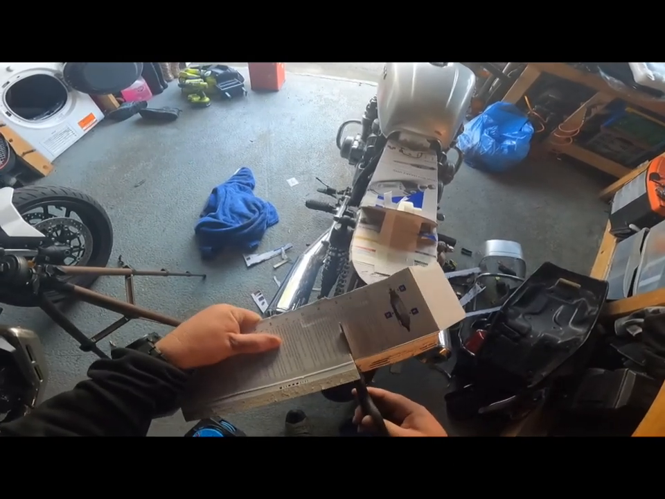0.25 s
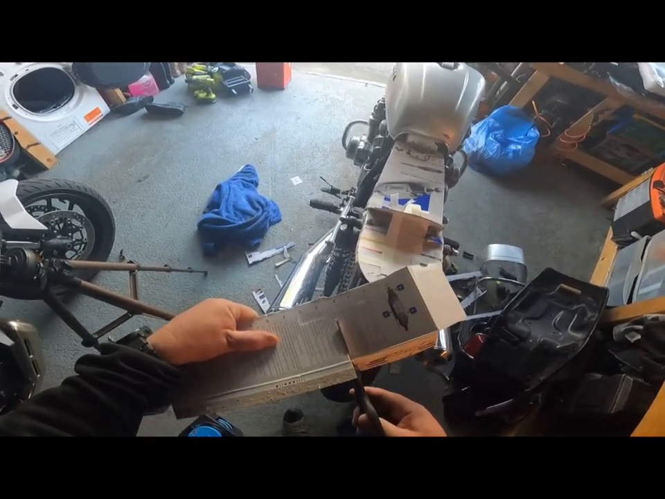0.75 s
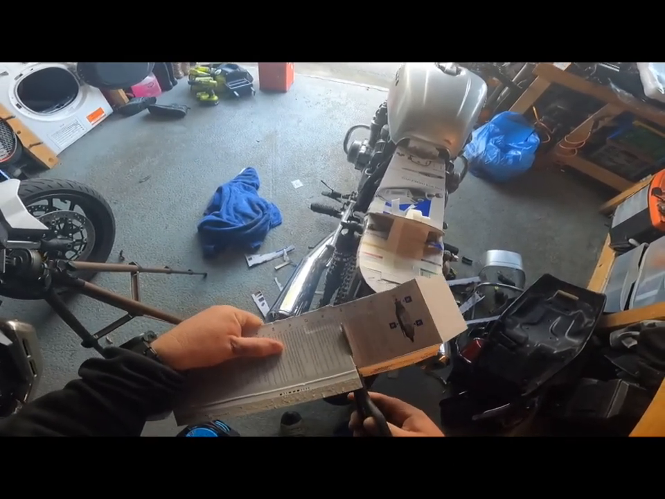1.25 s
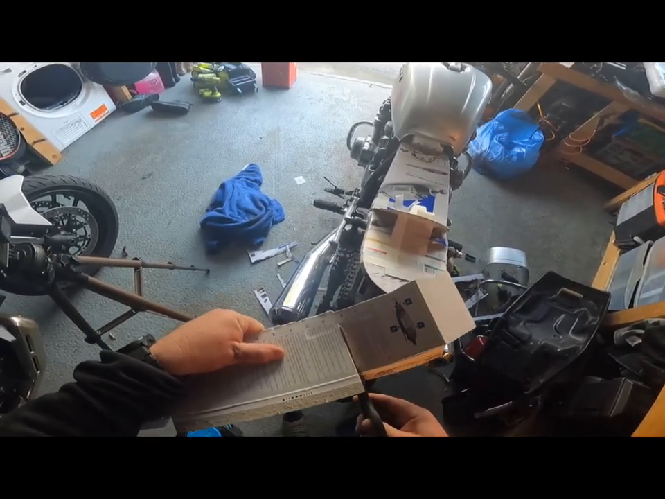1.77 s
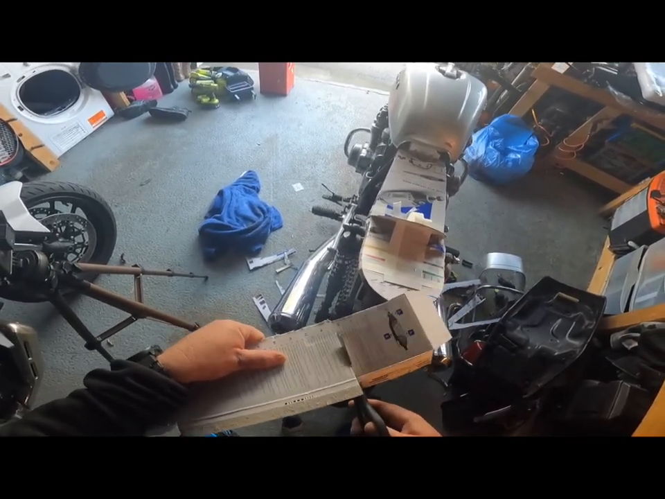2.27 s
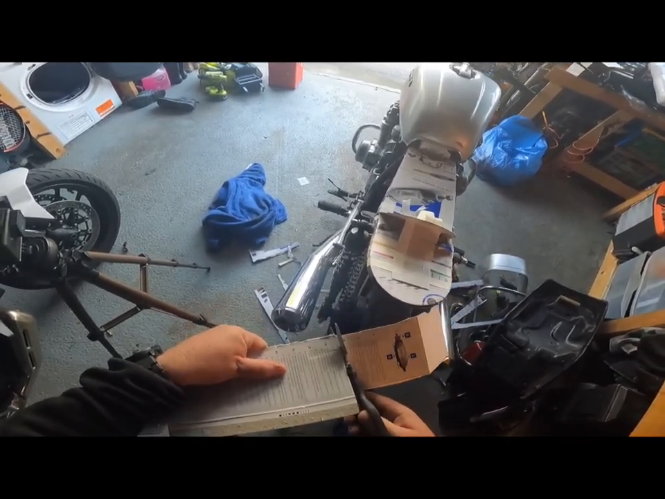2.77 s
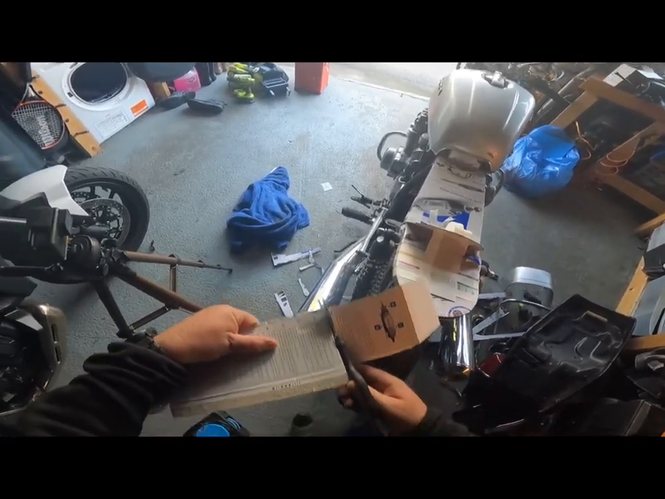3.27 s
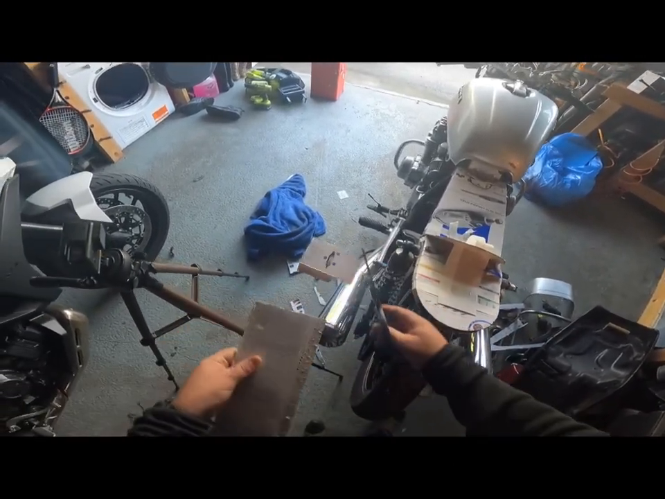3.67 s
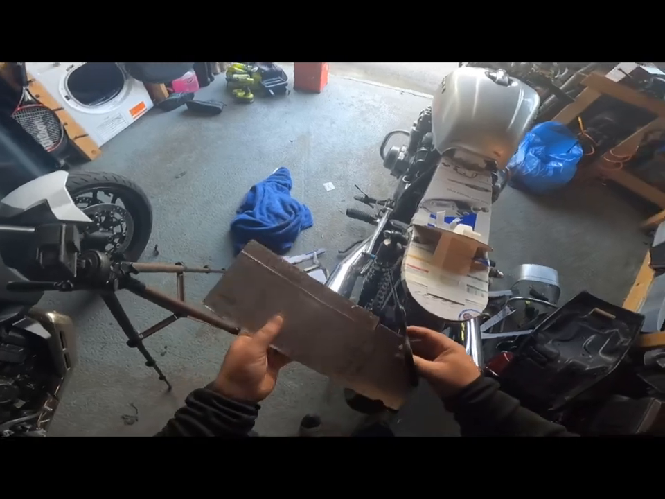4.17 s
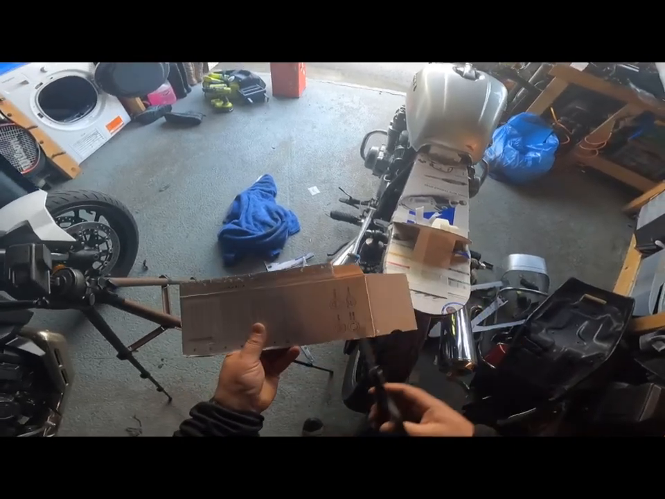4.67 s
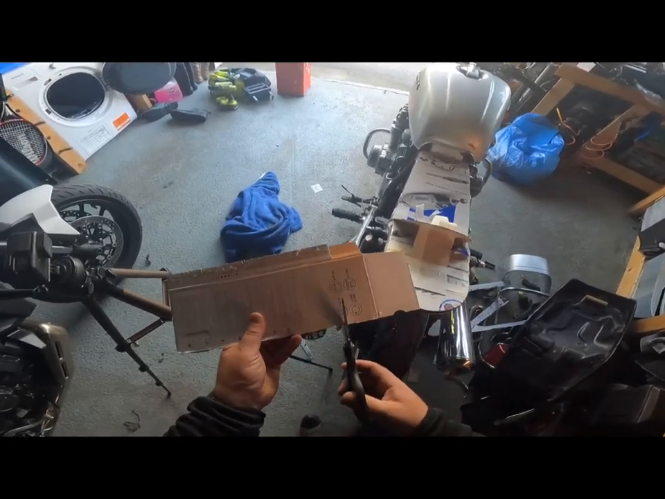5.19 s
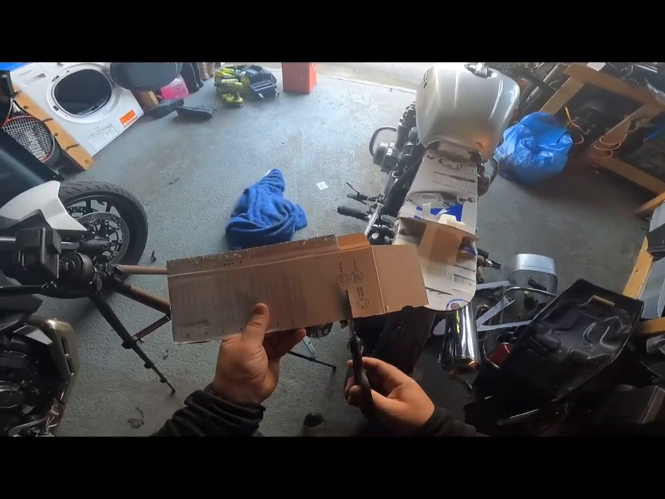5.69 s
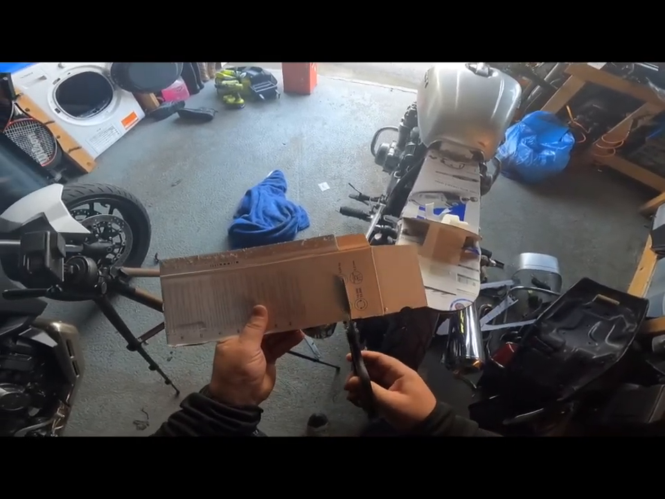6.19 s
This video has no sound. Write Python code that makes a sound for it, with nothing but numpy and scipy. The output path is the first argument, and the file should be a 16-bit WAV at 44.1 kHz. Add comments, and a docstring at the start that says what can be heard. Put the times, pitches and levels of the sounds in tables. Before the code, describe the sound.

Corrugated cardboard crunches and snaps between scissor blades, in about six irregular bursts separated by light rustling and rubbing. The cutting then turns quieter, ending in dry scrapes, small ticks and thin, faint squeaks of steel on board. The microphone is very close, in a garage with a short echo, a soft hiss and a slight low rumble.

```python
"""Scissors cutting corrugated cardboard

A strip is cut close to a body-worn camera in a garage. The board cracks and knocks as its flutes
give way; the blades scrape along the cut, tick, clack and faintly sing. The concrete room answers
briefly, and a low rumble wavers over a quiet hiss."""
import sys
import numpy as np
from scipy import signal
from scipy.fft import rfft, irfft, next_fast_len
from scipy.io import wavfile
from scipy.ndimage import uniform_filter1d, map_coordinates

SR = 44100
rng = np.random.default_rng(int(sys.argv[2]) if len(sys.argv) > 2 else 0)


def to_wav(s):
    """Save 16-bit WAV."""
    ch = np.atleast_2d(s).T  # columns
    pcm = np.round(np.clip(ch, -1, 1) * 32767)  # PCM
    wavfile.write(sys.argv[1], SR, pcm.astype(np.int16))


N = 283991
EVENT_T = np.arange(SR // 4) / SR  # time axis of one hit [s]
HOLD_POWER = 1.24  # a ring holds while the board is pushed, then stops quickly


def amp(db):
    """Gain of a level in dB."""
    return 10 ** (np.asarray(db) / 20)


def unit(x):
    """x at rms 1."""
    return x / np.sqrt(np.mean(x ** 2) + 1e-20)


def span(start_s, samples=len(EVENT_T)):
    """Sample slice of one event."""
    return slice(round(start_s * SR), round(start_s * SR) + samples)


def along(points, hz):
    """Interpolate (Hz, value) points on a log frequency axis."""
    f, values = np.transpose(points)
    return np.interp(np.log(hz + 1), np.log(f + 1), values)


def wobble(rate_hz):
    """Smooth random curve, rate_hz knots a second."""
    knots = rng.standard_normal(int(N * rate_hz / SR) + 4)
    return map_coordinates(knots, [np.arange(N) * rate_hz / SR])


def filtered(x, response):
    """Apply a complex frequency response."""
    size = next_fast_len(N + SR // 2)
    return irfft(rfft(x, size) * response(np.fft.rfftfreq(size, 1 / SR)), size)[..., :N]


def noise(spectrum):
    """Coloured noise at rms 1."""
    return unit(filtered(rng.standard_normal(N), lambda hz: amp(along(spectrum, hz))))


def resonate(x, modes, top_hz):
    """Drive broad, well damped modes; dull above top_hz."""
    def response(f):
        peaks = sum((-1) ** k * amp(db) * 1j * f * width / (hz * hz - f * f + 1j * f * width)
                    for k, (hz, width, db) in enumerate(modes))
        return peaks / (1 + 1j * f / top_hz) ** 2
    return filtered(x, response)


def ringing(db, hz, t60_s, hold=HOLD_POWER):
    """A tone that holds, then dies ever faster."""
    return amp(db - 60 * (EVENT_T / t60_s) ** hold) * np.sin(2 * np.pi * hz * EVENT_T)


# Hiss spectrum: (frequency [Hz], density [dB])
HISS_SPECTRUM = [(35, -50), (60, -14), (118, -9), (300, -14.5), (3580, -35.5), (5720, -38.5), (9790, -39),
                 (16000, -43.5)]
# Rumble spectrum: (frequency [Hz], density [dB])
RUMBLE_SPECTRUM = [(12, -7.5), (40, -14), (70, -20), (150, -49), (400, -120)]
# Rumble swells: (time [s], level [dB])
RUMBLE_SWELLS = [(1.2, -44), (3.671, -53)]
def background():
    """Quiet hiss and a lumpy rumble that swells as the wearer moves."""
    t = np.arange(N) / SR
    lumps = amp(-53 + 2.5 * wobble(10))
    swells = sum(amp(db) * np.exp(-((t - s) / 0.049) ** 2) for s, db in RUMBLE_SWELLS)
    hiss = amp(-61 + 0.58 * wobble(1.8)) * noise(HISS_SPECTRUM)
    return hiss + (lumps + swells) * noise(RUMBLE_SPECTRUM)


# Room decay: (frequency [Hz], t60 [s])
GARAGE_DECAY = [(200, 0.21), (1000, 0.17), (4000, 0.15), (9000, 0.11)]
def garage(x):
    """Wall reflections: highs die first; a new tail pattern each half second."""
    out = np.zeros(N + SR)
    for start in range(0, N, SR // 2):
        hz, t, bands = signal.stft(rng.standard_normal(SR // 2), SR, nperseg=256)
        decay = amp(-60 * t / along(GARAGE_DECAY, hz)[:, None])
        tail = signal.istft(bands * decay, SR, nperseg=256)[1]
        tail *= 1 - np.exp(-np.arange(len(tail)) / SR / .005)
        wet = signal.fftconvolve(x[start:start + SR // 2], tail / np.linalg.norm(tail))
        out[start:start + len(wet)] += wet
    return out[:N]


# Sheet modes: (frequency [Hz], width [Hz], gain [dB])
BOARD_MODES = [(242, 160, -0.5), (678, 224, 7), (848, 336, 5.5), (1220, 394, 3.5), (2024, 573, 0.5),
               (3368, 4100, -14.5)]
def board(drive):
    """The well damped corrugated sheet resonates."""
    return resonate(drive, BOARD_MODES, top_hz=4000)


# Fibre rasp spectrum: (frequency [Hz], density [dB])
RASP_SPECTRUM = [(1470, -18), (2500, 6.5), (4110, 1), (6600, 1), (8800, -8.5), (13500, -12.5), (16000, -24)]
def friction():
    """Fibres catch and slip in clumps: coarse grains, the sheet they drive, and fine rasp."""
    clumps_db = 3.5 * wobble(120)
    grains = unit(amp(clumps_db + 1.9 * wobble(400)) * rng.standard_normal(N))
    bands = signal.stft(noise(RASP_SPECTRUM), nperseg=256)[2]
    flicker = uniform_filter1d(rng.standard_normal(bands.shape), size=5, axis=0)
    flicker = unit(uniform_filter1d(flicker, size=16, axis=1))  # narrow bands come and go
    scrape = signal.istft(bands * amp(3 * flicker), nperseg=256)[1][:N]
    rasp = unit(amp(0.5 * clumps_db + 1.8 * wobble(700)) * scrape)
    return grains, unit(board(grains)), rasp


# Hands and sleeves through the camera body: (frequency [Hz], density [dB])
HAND_SPECTRUM = [(40, -18.5), (110, -0.5), (320, -8.5), (900, -48.5)]
# Rustle envelope: (time [s], sheet level [dB], rasp level [dB])
RUSTLE_LEVELS = [(0.0, -57.5, -74.5), (0.54, -63.5, -80.5), (1.721, -57, -69), (2.109, -64, -80),
                 (2.392, -47.5, -65), (2.689, -67, -78.5), (3.17, -71, -84), (3.32, -58, -67.5),
                 (3.95, -58, -64), (4.209, -51.5, -67), (4.429, -69, -74), (4.8, -62, -71.5),
                 (5.58, -74, -88), (6.13, -56, -65.5), (6.44, -57.5, -75)]
def rustle(sheet, rasp):
    """The strip never lies quite still in the hands."""
    times_s, *levels_db = np.transpose(RUSTLE_LEVELS)
    sheet_db, rasp_db = [np.interp(np.arange(N) / SR, times_s, db) for db in levels_db]
    hands = amp(-2 + 2.5 * wobble(8)) * noise(HAND_SPECTRUM)
    return amp(sheet_db) * (sheet + hands) + amp(rasp_db) * rasp


# Blade squeaks: (start [s], length [s], level [dB], first pitch [Hz], last pitch [Hz])
SQUEAKS = [(3.818, 0.043, -62, 6150, 6400), (4.367, 0.057, -48, 1164, 1900), (5.53, .22, -68, 2180, 2150),
           (6.052, 0.25, -62, 2210, 2160)]
def squeaks():
    """Steel sliding on the board sings in thin, wavering glides."""
    out = np.zeros(N)
    waver, flutter = 1 + 0.047 * wobble(200), wobble(90)
    for start_s, length_s, db, first_hz, last_hz in SQUEAKS:
        envelope = np.sqrt(np.hanning(round(length_s * SR)))
        at = span(start_s, len(envelope))
        cycles = np.cumsum(np.geomspace(first_hz, last_hz, len(envelope)) * waver[at]) / SR
        out[at] += amp(db) * envelope * flutter[at] * np.sin(2 * np.pi * cycles)
    return out


# Scrapes: (start [s], length [s], level [dB], flute pitch [Hz], relative rasp [dB])
SCRAPES = [(0.216, 0.051, -49, 760, -35), (0.256, 0.099, -46.5, 437, -18), (0.708, 0.17, -51.5, 780, -41.5),
           (0.84, 0.015, -26.5, 850, -26), (0.852, 0.0098, -27.5, 715, -21.5), (0.865, 0.01, -28, 860, -26),
           (1.074, 0.028, -36, 768, -32.5), (1.201, 0.092, -43.5, 770, -19),
           (1.671, 0.012, -34.5, 1340, -20.5), (1.874, 0.049, -38.5, 733, -32),
           (2.167, 0.039, -43.5, 726, -21.5), (2.257, 0.058, -45.5, 450, -15),
           (2.324, 0.072, -44.5, 563, -9.5), (3.218, 0.018, -43, 706, -27.5),
           (3.261, 0.015, -46, 710, -19.5), (3.323, 0.054, -33.5, 1530, -27.5),
           (3.353, 0.021, -27.5, 670, -26), (3.673, 0.075, -56.5, 2420, -35),
           (3.986, 0.029, -32.5, 1890, -20.5), (4.019, 0.027, -34, 1520, -25),
           (4.116, 0.3, -60.5, 1595, -1.5), (4.363, 0.054, -49, 1602, -16), (5.042, 0.11, -67, 1827, -6),
           (5.63, 0.1, -43.5, 565, -17), (5.732, 0.021, -42.5, 970, -14.5), (5.86, 0.13, -48.5, 1540, -6),
           (5.999, 0.032, -42.5, 605, -18), (6.057, 0.097, -45.5, 1040, -15),
           (6.243, 0.078, -41.5, 700, -10), (6.358, 0.03, -47, 1330, -28)]
def scrapes(grains, sheet, rasp):
    """Blades and fingers press along the board; the duller the stroke, the more the flutes ring."""
    out = np.zeros(N)
    for start_s, length_s, db, hz, rasp_db in SCRAPES:
        progress = np.linspace(0, 1, round(max(length_s, .006) * SR))
        at = span(start_s, len(progress))
        pressure = amp(db) * np.sin(np.pi * progress ** 1.02) ** 0.74
        flute = signal.iirpeak(hz, Q=6, fs=SR)
        hollow = unit(signal.lfilter(*flute, signal.lfilter(*flute, grains[at])))
        hollow_share = np.clip(0.02 * (-13 - rasp_db), 0, 1)
        body = np.sqrt(hollow_share) * hollow + np.sqrt(1 - hollow_share) * sheet[at]
        out[at] += pressure * (body + amp(rasp_db) * rasp[at])
    return out


# Strip thumps: (time [s], level [dB], pitch [Hz])
THUMPS = [(0.776, -24, 203), (1.461, -16, 205), (1.6069, -22, 250), (1.717, -24, 240), (2.069, -38, 167),
          (2.2, -34.5, 165), (2.296, -34, 164), (2.36, -30, 95), (2.38, -18, 243), (2.381, -22, 91),
          (2.457, -18, 131), (2.468, -23, 259.6), (3.368, -25, 258.5), (3.987, -30.5, 283)]
def thumps():
    """The whole strip flexes in the hand: a soft onset, 60 dB down in six cycles."""
    ring = np.zeros(N + SR)
    for time_s, db, hz in THUMPS:
        ring[span(time_s)] += ringing(db, hz, t60_s=6 / hz) * np.tanh(EVENT_T * hz * 2.5)
    return ring[:N]


# Blade and fibre ticks: (time [s], level [dB], pitch [Hz])
DRY_TICKS = [(1.7098, -15, 962), (1.7115, -16.5, 5000), (3.504, -36.5, 3840), (3.959, -38, 1973),
             (3.991, -24, 4240), (4.134, -28, 1520), (4.3337, -40, 905), (5.703, -27.5, 640),
             (5.738, -28.5, 970), (5.981, -34, 6130), (6.11, -31.5, 1100), (6.125, -27.5, 1176),
             (6.138, -30, 1140), (6.2555, -33, 720), (6.314, -33, 6060)]
def ticks():
    """Blades tick and single fibres snap: a ring and an impulse, drier at high pitch."""
    ring, impulses = np.zeros((2, N + SR))
    for time_s, db, hz in DRY_TICKS:
        rise = np.tanh(EVENT_T / .002 * (hz / 1000) ** 2)
        ring[span(time_s)] += rise * ringing(db + 2.5, hz, t60_s=.014 * (1000 / hz) ** 1.48)
        impulses[round(time_s * SR)] += amp(db - 4.5) * hz / 4000
    return ring[:N], impulses[:N]


# Blade clacks: (time [s], level [dB], pitch [Hz], t60 [s])
CLACKS = [(0.8907, -2, 1200, .006), (1.713, -7, 1938, 0.0042), (3.36, -16.5, 4790, 0.002),
          (3.3687, -10, 4595, .003), (4.0498, -4, 2963, .003)]
def clacks():
    """The blades bite home with a hard, short ring."""
    ring = np.zeros(N + SR)
    for time_s, db, hz, t60_s in CLACKS:
        ring[span(time_s)] += ringing(db, hz, t60_s, hold=2.0)
    return ring[:N]


# Crack brightness: (frequency [Hz], width [Hz], gain [dB])
EDGE_MODES = [(2140, 720, 8.5), (3170, 2400, 8.5), (5270, 3000, 7), (7500, 1800, 2)]
def bright_edge(fracture):
    """The sharp sound of parting fibres, weak in the top octave."""
    edge = resonate(fracture, EDGE_MODES, top_hz=5700)
    return filtered(edge, lambda hz: 1 / (1 - (hz / 10000) ** 2 + 1j * hz / 7500))


# Board cracks and knocks: (time [s], level [dB], flap pitch [Hz], sharpness [dB])
FLUTE_CRACKS = [(0.018, -22, 780, -17), (0.0575, -16.5, 800, -19), (0.105, -14.5, 881, -32),
                (0.591, -38.5, 660, -6.5), (0.7751, -13, 900, -15), (0.885, -15, 761, -24),
                (0.8904, -8, 2080, -1), (1.452, -22, 1700, -15.5), (1.462, -13, 628, -28),
                (1.6066, -27.5, 1240, -24), (1.6845, -12.5, 863, -19.5), (1.704, -11.5, 902, -30),
                (1.713, -10.5, 656, -1), (2.378, -9, 850, -14), (2.44, -9, 1233, -19),
                (2.459, -16, 530, -12), (3.1437, -37, 720, -13), (3.311, -22.5, 1420, -8.5),
                (3.3546, -17, 1326, -28), (3.3688, -8.5, 1880, -0.5), (3.392, -30, 410, -15),
                (3.9869, -14, 2050, -22), (4.0503, -10.5, 1740, -2.5), (4.0635, -15.5, 1366, -14),
                (4.121, -24.5, 451, -29), (4.1525, -23, 610, -10.5), (4.414, -32, 432, -20.5),
                (5.1374, -36, 349, -17.5), (5.526, -35, 546, -22.5), (6.0833, -21.5, 1022, -26)]
def cracks():
    """Flutes give way: the free flap rings, the sheet shakes, fibres part at once and then splinter."""
    ring, shake, impulses, splinter = np.zeros((4, N + SR))
    t = EVENT_T
    for time_s, db, hz, sharp_db in FLUTE_CRACKS:
        at = span(time_s)
        t60_s = 0.012 * (1040 / hz) ** 0.75 * amp(-0.3 * sharp_db)  # shorter when high or sharp
        rise = 1 - np.exp(-t / (.00008 * t60_s / 0.0035))  # dull cracks come on softly
        t60_s = max(t60_s, .004)
        envelope = rise * amp(db - 60 * (t / t60_s) ** HOLD_POWER)
        ring[at] += rise * ringing(db - 3.5, hz, t60_s)
        shake[at] += envelope * amp(0.16 * sharp_db - 60 * t / 0.072)
        impulses[at.start] = amp(db + sharp_db + 12)
        splinter[at] += amp(db + sharp_db + 2.5 - 60 * t / .006)
    knocks = amp(9.0) * board(shake[:N] * rng.standard_normal(N))
    fracture = impulses[:N] + splinter[:N] * rng.standard_normal(N)
    return ring[:N], knocks, fracture


def scene():
    """Both channels alike; the rings are heard close by and excite the room less."""
    flap_ring, knocks, fracture = cracks()
    tick_ring, tick_impulses = ticks()
    rings = flap_ring + tick_ring + clacks() + thumps()
    rings *= amp(1.6 * wobble(450))  # crushing fibres make every ring uneven
    grains, sheet, rasp = friction()
    rubbing = rustle(sheet, rasp) + scrapes(grains, sheet, rasp) + squeaks()
    cutting = knocks + bright_edge(fracture + tick_impulses) + rubbing
    room = amp(-11.5) * garage(cutting + amp(-11) * rings)
    return np.tile(rings + cutting + room + background(), (2, 1))


def record(dry):
    """Soft clip, a faint stereo width in the treble, and a band limit."""
    ceiling, top_hz = .92, 15800
    clipped = dry / (1 + np.abs(dry / ceiling) ** 6) ** (1 / 6)
    side = amp(-33.0) * filtered(clipped[0], lambda hz: 1j * hz ** 2 / (hz ** 2 + 5000 ** 2))
    return filtered(clipped + [side, -side], lambda hz: hz < top_hz)


dry = scene()
out = record(dry)
to_wav(out)
```